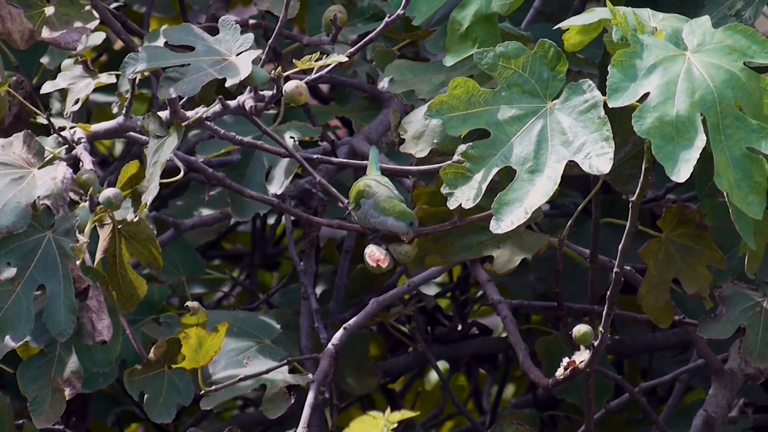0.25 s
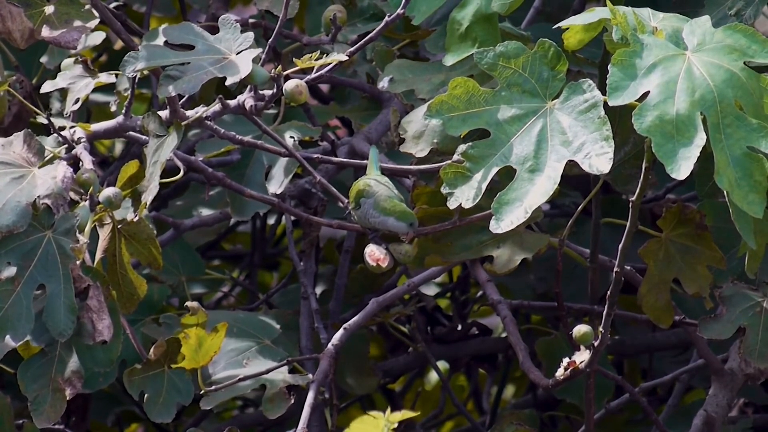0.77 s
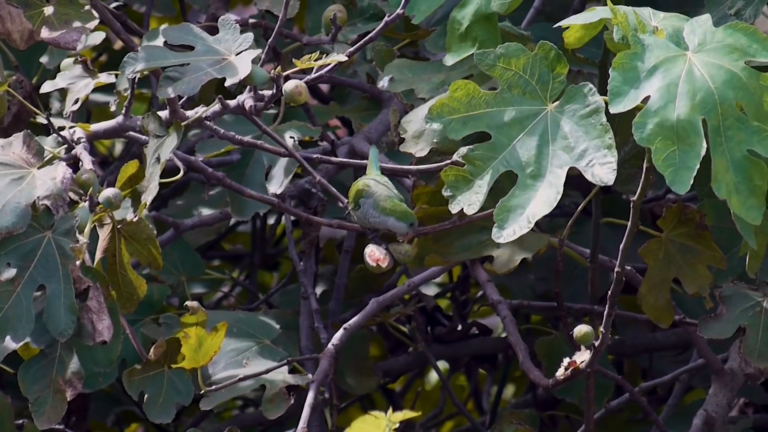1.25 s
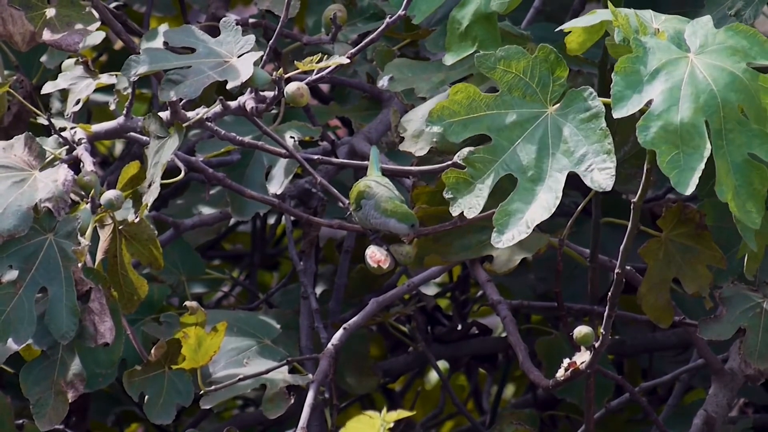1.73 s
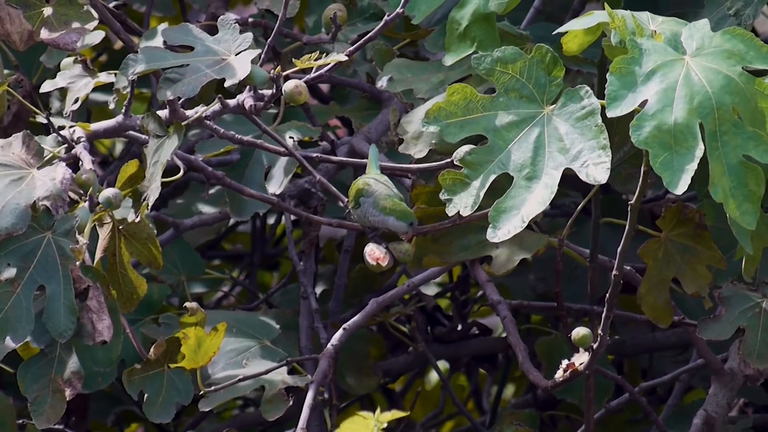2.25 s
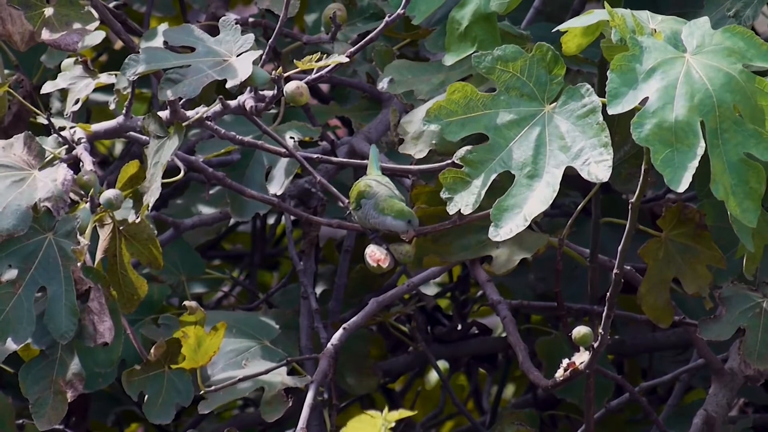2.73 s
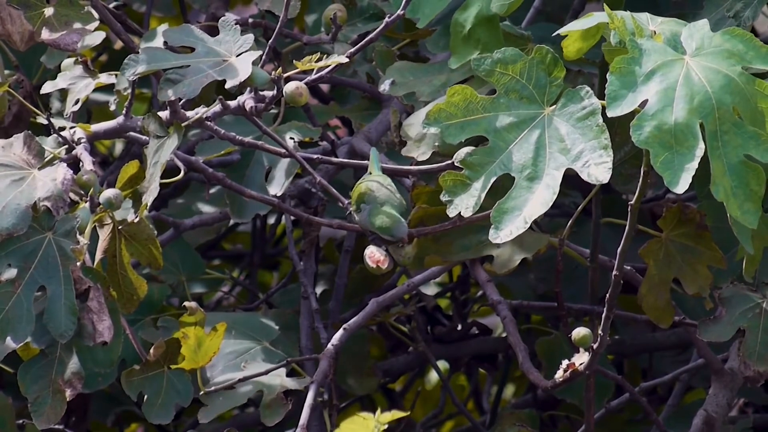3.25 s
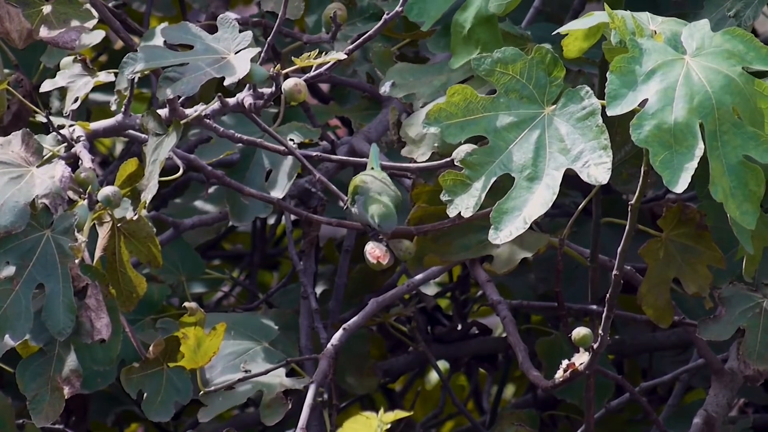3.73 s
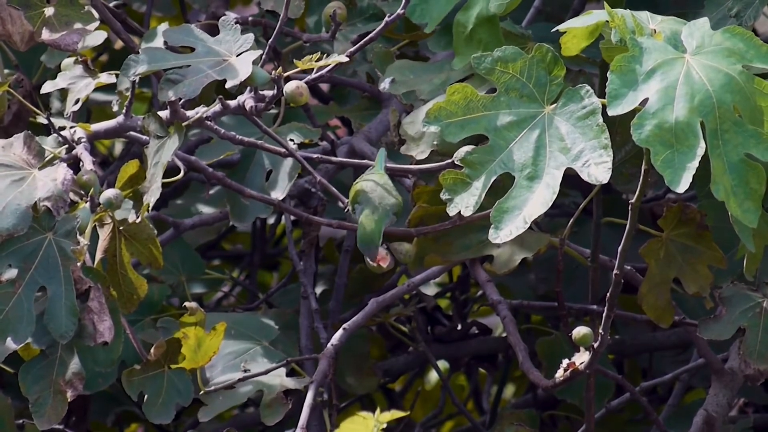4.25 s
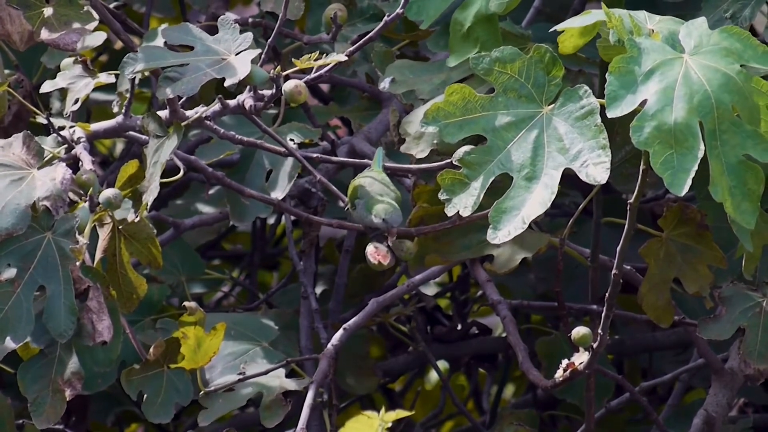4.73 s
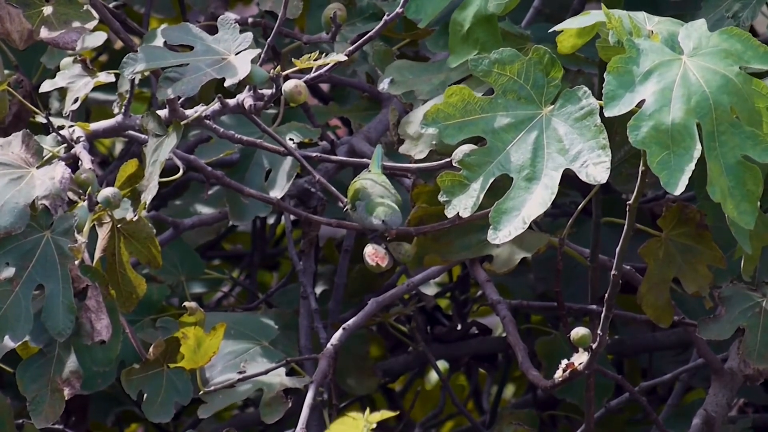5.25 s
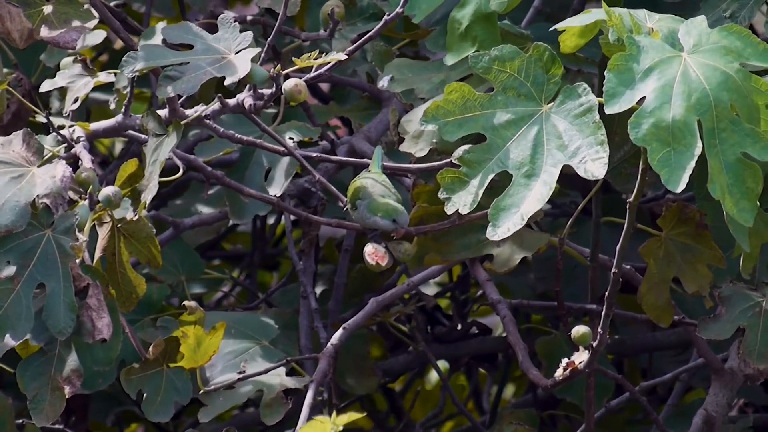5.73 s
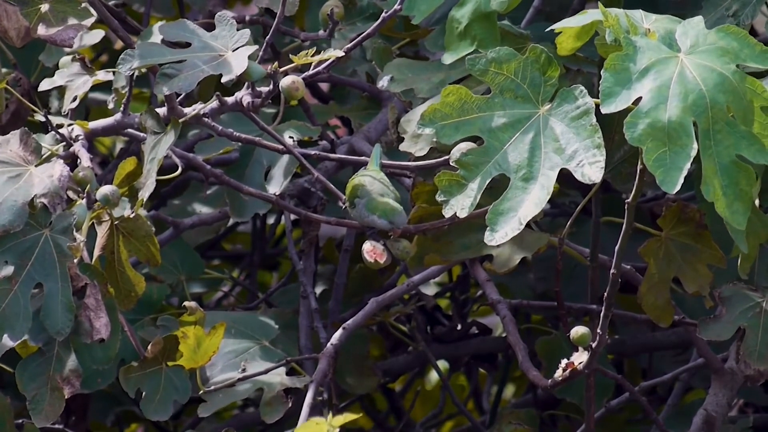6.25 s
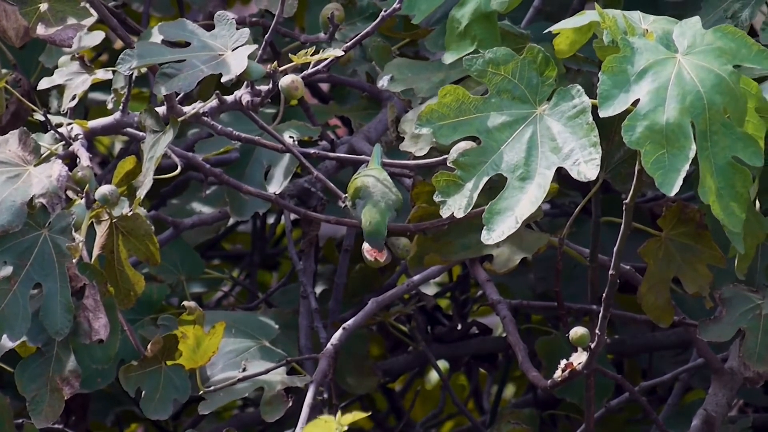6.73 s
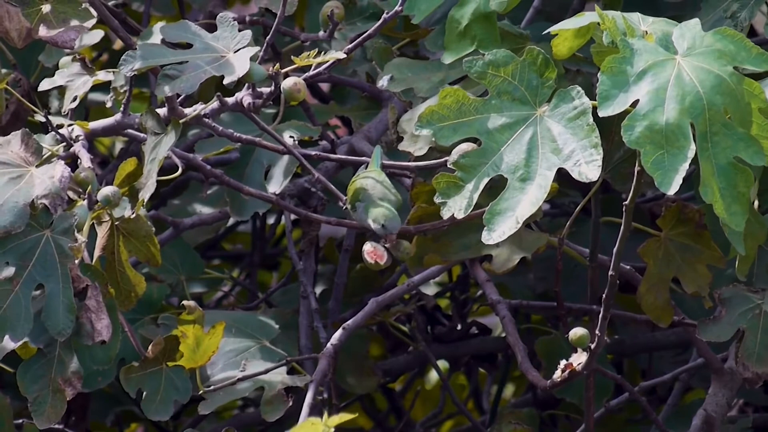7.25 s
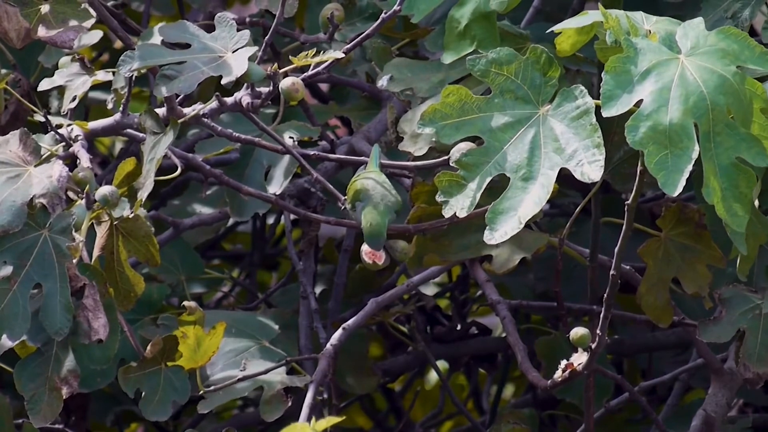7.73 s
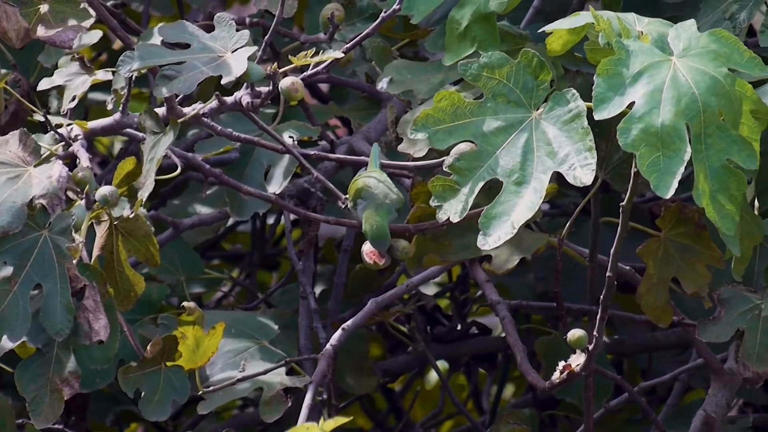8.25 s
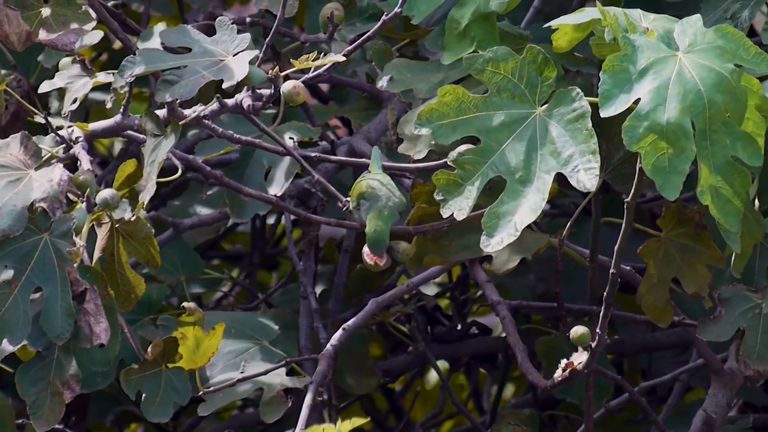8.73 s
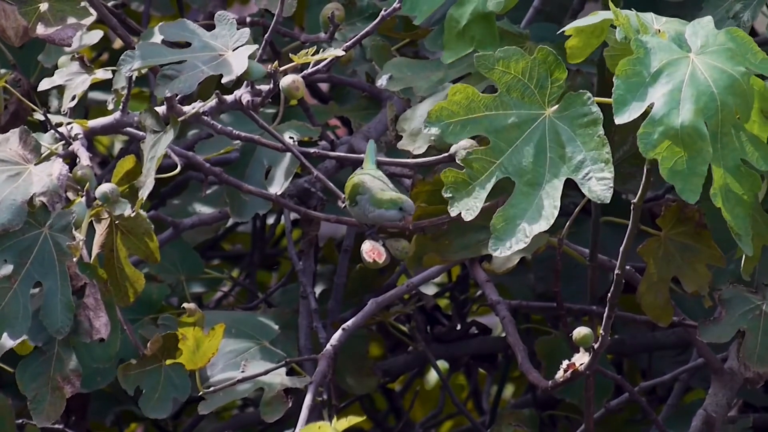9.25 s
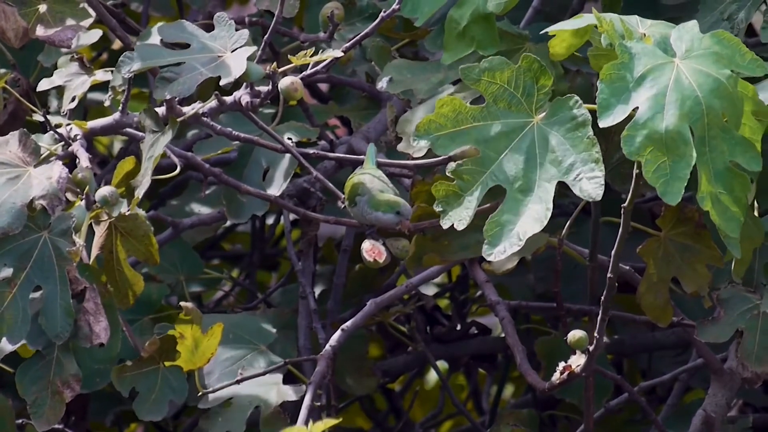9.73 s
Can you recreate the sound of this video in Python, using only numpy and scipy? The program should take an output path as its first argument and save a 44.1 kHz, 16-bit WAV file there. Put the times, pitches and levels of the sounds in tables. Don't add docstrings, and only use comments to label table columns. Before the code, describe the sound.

A cricket pulses in quick shrill chirps on the left while birds whistle, slide and buzz in echoing trees over faint distant traffic.

```python
import sys
import numpy as np
from scipy import signal
from scipy.fft import rfft, irfft, next_fast_len
from scipy.io import wavfile

SR = 44100
rng = np.random.default_rng(int(sys.argv[2]) if len(sys.argv) > 2 else 0)


def linear_from_db(decibels):
    return 10 ** (np.asarray(decibels, float) / 20)


def generate_wav(sig):
    pcm = np.round(np.clip(np.atleast_2d(sig).T, -1, 1) * 32767).astype(np.int16)
    wavfile.write(sys.argv[1], SR, pcm)


N = 440118


def rms_one(x):
    return x / np.sqrt(np.mean(x ** 2) + 1e-20)


def drift(rate_hz):
    r = np.exp(-80 * np.pi * rate_hz / SR)
    slow = signal.lfilter([1], [1, -2 * r, r * r], rng.standard_normal(N // 40 + 2002))[2000:]
    return np.interp(np.arange(N) / 40, np.arange(len(slow)), rms_one(slow))


def sides(x, pan_db):
    return x * linear_from_db(np.array([pan_db / 2, -pan_db / 2]).reshape(2, -1))


def pair(side_db, size):
    mid, side = rng.standard_normal((2, size))
    return np.array([mid + linear_from_db(side_db) * side, mid - linear_from_db(side_db) * side])


def coloured(spectrum, side_db):
    size = next_fast_len(N)
    hz, level_db = np.transpose(spectrum)
    log_hz = np.log(np.fft.rfftfreq(size, 1 / SR) + 1)
    gain = linear_from_db(np.interp(log_hz, np.log(hz), level_db, left=-99, right=-99))
    return rms_one(irfft(rfft(pair(side_db, size)) * gain, size)[:, :N])


def add(track, s, sound):
    i = int(s * SR)
    track[..., i:i + sound.shape[-1]] += sound[..., :N - i]


def cricket():
    # (frequency [Hz], width [Hz], level [dB])
    wing_modes = [(5819, 153, 8), (5556, 350, 2.5), (5254, 430, -8), (4700, 250, -23.5), (6500, 200, -31)]
    stroke_hz = 30 + 1.5 * drift(3.04)
    stroke = 1 + 0.14 * np.sin(2 * np.pi * np.cumsum(stroke_hz) / SR)
    grit = linear_from_db(2.5 * np.minimum(rng.exponential(1, N), 4))
    teeth = pair(-1.2, N) * grit * stroke
    wing = 0
    for k, (hz, width_hz, mode_db) in enumerate(wing_modes):
        r = np.exp(-np.pi * width_hz / SR)
        b = (1 - r * r) / 2 * np.array([1, 0, -1])
        a = [1, -2 * r * np.cos(2 * np.pi * hz / SR), r * r]
        ringing = signal.lfilter(b, a, signal.lfilter(b, a, teeth))
        wing = wing + (-1) ** k * linear_from_db(mode_db) * ringing
    return rms_one(wing) * chirps()


def chirps():
    # (start [s], chirps [count], period [s])
    bouts = [
        (-.225, 8, .268),
        (2.01, 4, .272),
        (3.05, 5, .264),
        (4.46, 14, .2615),
        (8.61, 6, .260),
    ]
    attack_s, hold_s, release_s = 0.075, 0.083, 0.08
    straight_db, straight_pan_db = -53.5, 15.5
    echo_db, echo_pan_db, echo_t60_s = -50.5, 6.5, 1
    t = np.arange(-SR, N) / SR
    corners = np.cumsum([0, attack_s, hold_s, release_s])
    starts = [s + k * period for s, count, period in bouts for k in range(int(round(count)))]
    strengths = linear_from_db(0.4 * rng.standard_normal(len(starts)))
    swell = sum(g * np.interp(t - s, corners, [0, 1, 1, 0]) for s, g in zip(starts, strengths))
    r = linear_from_db(-120 / (echo_t60_s * SR))
    echo = np.sqrt(signal.lfilter([1 - r], [1, -r], swell ** 2))
    straight = sides(linear_from_db(straight_db) * swell, straight_pan_db)
    return np.hypot(straight, sides(linear_from_db(echo_db) * echo, echo_pan_db))[:, SR:]


def birds():
    direct, scattered, thicket = np.zeros((3, 2, N))
    peeps(direct, scattered)
    whistlers(direct, scattered)
    buzzers(direct, scattered, thicket)
    heard = direct + trees(scattered, build_s=0.012, t60_s=0.99, high_t60_s=0.87)
    return heard + trees(thicket, build_s=0.01, t60_s=0.81, high_t60_s=0.54)


def whistlers(direct, scattered):
    # (start [s], length [s], from [Hz], to [Hz], scattered level [dB])
    loud = [(.66, 0.091, 4560, 4484, -44), (.71, .028, 3794, 3370, -29.5), (.727, 0.081, 3224, 3115, -26),
            (.785, 0.05, 4523, 4505, -38), (.823, 0.03, 3725, 3460, -22), (.855, 0.064, 3187, 3129, -19),
            (.917, 0.068, 4510, 4495, -37.5), (.947, 0.014, 3690, 3500, -20.5),
            (.962, 0.067, 3180, 3062, -25.5)]
    right = [(.514, 0.15, 2380, 2810, -54.5), (.555, 0.15, 2782, 3140, -34.5),
             (4.348, 0.086, 1977, 1967, -61.5)]
    high = [(1.354, 0.07, 3620, 4120, -50), (1.417, 0.055, 6080, 6420, -54),
            (1.498, 0.093, 6264, 6667, -65), (4.929, 0.13, 6930, 6890, -48.5),
            (5.049, 0.15, 5820, 6500, -43), (5.914, 0.13, 6900, 7340, -46),
            (5.963, 0.13, 6790, 7260, -58.5), (6.016, 0.062, 6500, 6520, -48.5),
            (6.092, .12, 5220, 4700, -54), (6.675, 0.048, 6624, 6810, -61.5), (9.5, 0.47, 7680, 7790, -77),
            (9.502, 0.26, 6170, 6540, -66.5)]
    falling = [(2.805, .064, 3340, 2960, -62.5), (2.838, 0.06, 3050, 2900, -51),
               (2.875, 0.047, 2813, 2833, -52.5), (3.5, 0.054, 3150, 3147, -61),
               (3.51, 0.09, 2954, 2927, -46.5), (3.57, .06, 2896, 2780, -49.5),
               (3.613, 0.037, 2670, 2470, -50.5), (3.672, .075, 2373, 2347, -53.5),
               (7.3, 0.078, 3590, 2940, -70.5)]
    low = [(4.435, 0.11, 2440, 2360, -41), (5.67, 0.1, 2465, 2560, -48.5),
           (5.735, 0.068, 2604, 2604, -37.5), (5.905, .079, 2973, 3480, -29.5),
           (5.982, 0.22, 3308, 3185, -37)]
    swoop = [(5.125, 0.02, 4620, 3940, -37), (5.171, 0.042, 4060, 3480, -32),
             (5.208, 0.086, 3517, 3383, -32), (5.263, 0.066, 3380, 2824, -35.5),
             (5.302, .11, 3092, 3433, -40)]
    near = [(4.92, 0.016, 4426, 4620, -69), (4.938, 0.14, 4305, 4340, -57.5),
            (5.115, 0.12, 7770, 7630, -78.5), (5.829, .055, 2103, 2150, -70),
            (6.55, 0.043, 4240, 4020, -61.5), (7.421, .013, 7760, 6790, -60.5),
            (7.428, 0.038, 7050, 6280, -48), (7.436, .038, 6250, 6590, -49.5),
            (8.9, .31, 2242, 2229, -62.5)]
    # (notes, direct over scattered [dB], pitch swing [Hz], left over right [dB])
    singers = [(loud, 1.5, 7.4, 0.4), (right, -5.5, 16, -6.5), (high, -17, 55, 2.5), (falling, -8.5, 17, 5.9),
               (low, -13, 14, 5), (swoop, -14.5, 12, 5.7), (near, 3.5, 8.0, 3.6)]
    for notes, direct_db, swing_hz, pan_db in singers:
        for s, length_s, from_hz, to_hz, level_db in notes:
            tone = sides(linear_from_db(level_db) * glide(length_s, from_hz, to_hz, swing_hz, edge=0.25), pan_db)
            add(direct, s, linear_from_db(direct_db) * tone)
            add(scattered, s, tone)


def buzzers(direct, scattered, thicket):
    # (start [s], length [s], from [Hz], to [Hz], scattered level [dB])
    fine = [(4.512, 0.071, 2946, 2900, -40), (4.58, 0.086, 2920, 2860, -38.5)]
    broad = [(4.532, 0.1, 3420, 3377, -39), (4.56, 0.34, 3194, 3247, -47.5),
             (5.07, 0.081, 5250, 5200, -47.5)]
    coarse = [(4.1, .08, 4900, 6200, -76.5), (6.54, 0.091, 3900, 3376, -47.5),
              (6.595, .11, 3860, 3668, -41)]
    last = [(9.085, 0.092, 2872, 2886, -39), (9.09, 0.15, 2720, 2940, -65), (9.092, 0.05, 3200, 3090, -28),
            (9.1, 0.12, 3295, 3413, -31.5), (9.11, 0.13, 3480, 3672, -68.5), (9.15, .15, 3161, 3258, -27.5),
            (9.145, .16, 2892, 2950, -33.5)]
    # (notes, pitch swing [Hz], left over right [dB])
    singers = [(fine, 63, 6), (broad, 185, 6.9), (coarse, 247, 6.44), (last, 38, -0.4)]
    for notes, swing_hz, pan_db in singers:
        for s, length_s, from_hz, to_hz, level_db in notes:
            tone = sides(linear_from_db(level_db) * glide(length_s, from_hz, to_hz, swing_hz, edge=0.18), pan_db)
            add(direct, s, linear_from_db(-10) * tone)
            add(thicket, s, tone)
            add(scattered, s, linear_from_db(-6) * tone)


def peeps(direct, scattered):
    # (time [s], first note level [dB], second note level [dB])
    calls = [
        (.033, -75, -71),
        (2.395, -72, -71),
        (3.24, -72, -71),
        (3.775, -76, -90),
        (5.84, -71, -90),
        (7.27, -72, -68),
    ]
    # (from [Hz], to [Hz])
    note_hz = [
        (4000, 4170),
        (3200, 3750),
    ]
    length_s, gap_s = 0.032, 0.061
    for s, *levels_db in calls:
        for k, (from_hz, to_hz) in enumerate(note_hz):
            tone = sides(linear_from_db(levels_db[k]) * glide(length_s, from_hz, to_hz, 40, edge=0.13), 4.0)
            add(direct, s + k * gap_s, tone)
            add(scattered, s + k * gap_s, linear_from_db(-4) * tone)


def glide(length_s, from_hz, to_hz, swing_hz, edge):
    u = np.linspace(0, 1, int(length_s * SR))
    uneven = 1.2 * np.interp(u, np.linspace(0, 1, 16), rng.standard_normal(16))
    buzz = np.sin(2 * np.pi * 156 * length_s * u + uneven)
    hz = from_hz + (to_hz - from_hz) * u + swing_hz * buzz
    swell = np.sin(np.pi / 2 * np.clip(np.minimum(u, 1 - u) / edge, 0, 1)) ** 2
    return np.sqrt(2) * swell * np.sin(2 * np.pi * np.cumsum(hz) / SR)


def trees(x, build_s, t60_s, high_t60_s):
    t = np.arange(int(1.6 * SR)) / SR
    white = pair(-0.46, len(t))
    low = signal.sosfiltfilt(signal.butter(2, 4800, fs=SR, output="sos"), white)
    dying = low * linear_from_db(-60 * t / t60_s) + (white - low) * linear_from_db(-60 * t / high_t60_s)
    response = (1 - np.exp(-t / build_s)) * dying
    return signal.fftconvolve(x, response / np.sqrt(np.sum(response ** 2) / 2), axes=1)[:, :N]


def long_whistle():
    # (time [s], level [dB], left over right [dB])
    course = [(8.7, -99, -2.5), (8.73, -40, -1.5), (8.794, -25, 1.0), (8.95, -29, -2.0), (8.978, -37, -5.5),
              (9.014, -35, -5.5), (9.062, -47, 4.0), (9.09, -53, -2.0), (9.1, -40, 0.0)]
    t = np.arange(N) / SR
    s, *columns = np.transpose(course)
    level_db, pan_db = [np.interp(t, s, column) for column in columns]
    start, end = s[0], s[-1]
    on = np.interp(t, [start, start + 0.01, end - 0.012, end], [0, 1, 1, 0])
    loudness = on * np.sqrt(2) * linear_from_db(level_db + 0.1 + 0.84 * drift(30))
    return sides(loudness * np.sin(2 * np.pi * 3128 * t), pan_db)


def ticks():
    # (time [s], peak level [dB], middle frequency [Hz])
    snaps = [
        (7.16, -58, 6000),
        (7.741, -68, 8500),
        (7.808, -48, 4600),
    ]
    out = np.zeros(N)
    for s, peak_db, hz in snaps:
        burst = rng.standard_normal(900) * np.exp(-np.arange(900) / 130)
        band = signal.butter(2, [hz / 1.3, hz * 1.25], "band", fs=SR, output="sos")
        add(out, s, linear_from_db(peak_db) * signal.sosfilt(band, burst))
    return out


def far_cricket():
    wing_hz, half_width_hz = 4646, 60
    band = signal.butter(2, [wing_hz - half_width_hz, wing_hz + half_width_hz], "band", fs=SR, output="sos")
    return linear_from_db(-79 + 2.9 * drift(1.2)) * rms_one(signal.sosfilt(band, pair(-0.5, N)))


def traffic():
    # (frequency [Hz], level per Hz [dB])
    rumble_spectrum = [(12, -44.5), (20, -6.5), (48, -6), (81, 1), (155, -7.5), (184, -14.5), (220, -13),
                       (290, -39.5), (480, -120)]
    # (frequency [Hz], level per Hz [dB])
    drone_spectrum = [(120, -30.5), (200, -6), (296, -4.5), (338, -2.5), (433, -6), (464, -5), (620, -17),
                      (810, -44.5), (1360, -120)]
    # (time [s], half length [s], level [dB])
    passes = [
        (0.734, .2, -64.5),
        (1.497, .15, -75.5),
        (2.473, .2, -59.5),
        (3.08, .2, -67.5),
        (3.606, 0.26, -67),
        (5.914, 0.89, -65),
        (7.712, 0.16, -63.5),
        (8.588, .3, -62),
    ]
    t = np.arange(N) / SR
    passing = sum(linear_from_db(2 * level_db) / (1 + ((t - s) / half_s) ** 2) ** 2 for s, half_s, level_db in passes)
    rumble = linear_from_db(-59.5 + 0.5 * drift(0.8)) * sides(coloured(rumble_spectrum, -9.5), np.array(0.8))
    roar = np.sqrt(linear_from_db(2 * -70) + passing)
    return rumble + roar * linear_from_db(1.2 * drift(3.7)) * coloured(drone_spectrum, -10.5)


def leaves():
    # (frequency [Hz], level per Hz [dB])
    rustle_spectrum = [(350, -34.5), (600, -5), (866, -4), (1670, -12), (2520, -18), (3070, -17),
                       (3310, -16.5), (4400, -17.5), (5720, -41), (9680, -120)]
    breeze_db_per_s = 0.5
    t = np.arange(N) / SR
    return linear_from_db(-72 + breeze_db_per_s * t + 0.6 * drift(0.87)) * coloured(rustle_spectrum, -9.5)


def air_and_hiss():
    # (frequency [Hz], level per Hz [dB])
    air_spectrum = [(2590, -38.5), (4400, -14.5), (4950, -11), (5270, 3), (5430, -6), (6120, -17.5),
                    (6630, -22.5), (7270, -29.5), (9450, -55.5), (16000, -120)]
    # (frequency [Hz], level per Hz [dB])
    hiss_spectrum = [(7000, -26), (8000, -14), (9000, -4.5), (10000, -5), (12000, -9.5), (14000, -15),
                     (16000, -19)]
    return linear_from_db(-63.5) * coloured(air_spectrum, -1.4) + linear_from_db(-91) * coloured(hiss_spectrum, -2.5)


def scene():
    singers = cricket() + birds() + long_whistle()
    return singers + ticks() + far_cricket() + traffic() + leaves() + air_and_hiss()


def band_limit(x):
    return signal.sosfilt(signal.butter(12, 15300, fs=SR, output="sos"), x)


def record(dry):
    ripple_levels = [-35, -45, -52, -57]
    turn = 2 * np.pi * 3899 * np.arange(N) / SR
    shake = sum(linear_from_db(ripple_db) * np.cos((k + 1) * turn) for k, ripple_db in enumerate(ripple_levels))
    mix = dry + shake * np.diff(dry, prepend=0)
    return band_limit(mix)


dry = scene()
out = record(dry)
generate_wav(out)
```